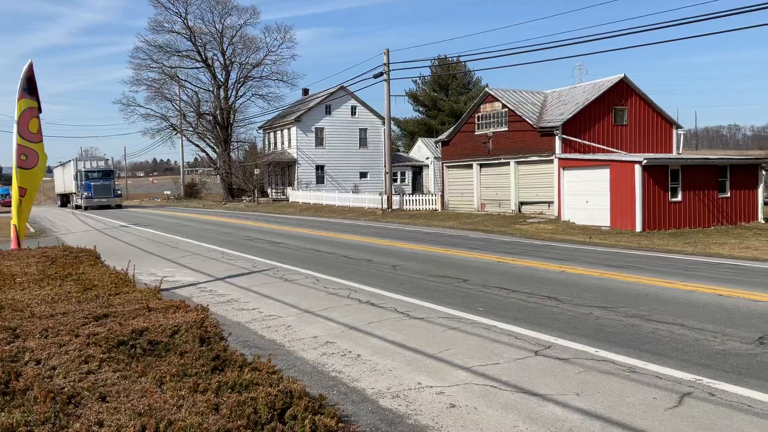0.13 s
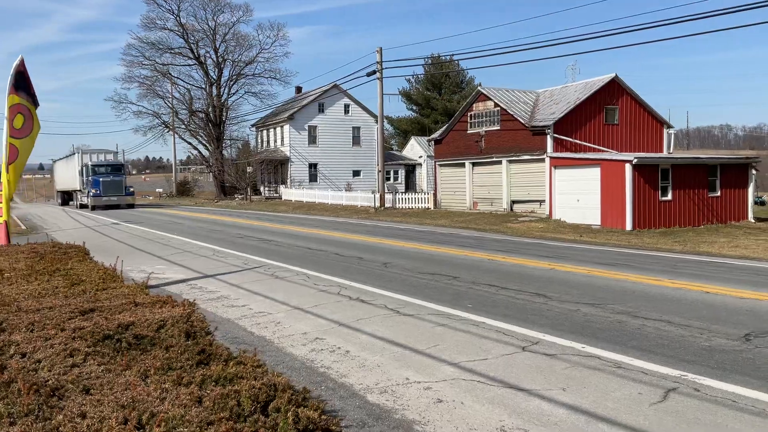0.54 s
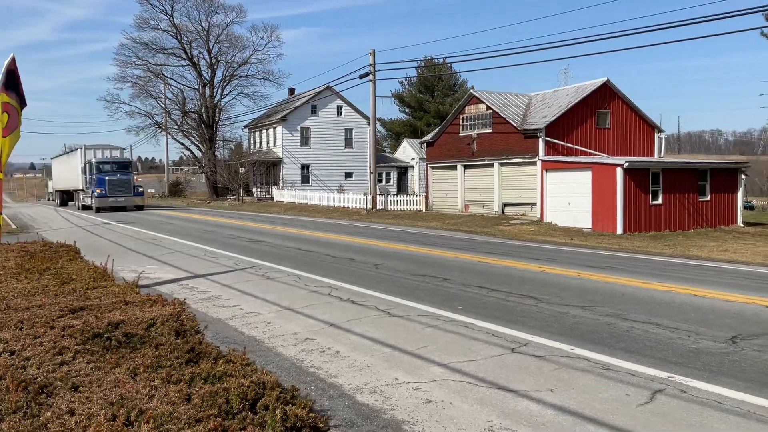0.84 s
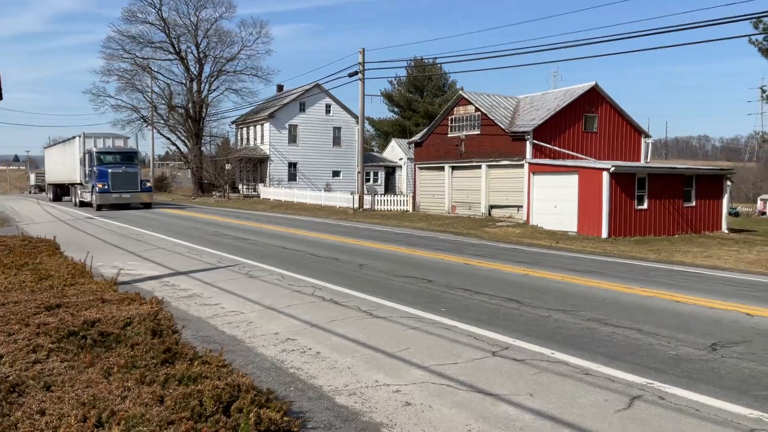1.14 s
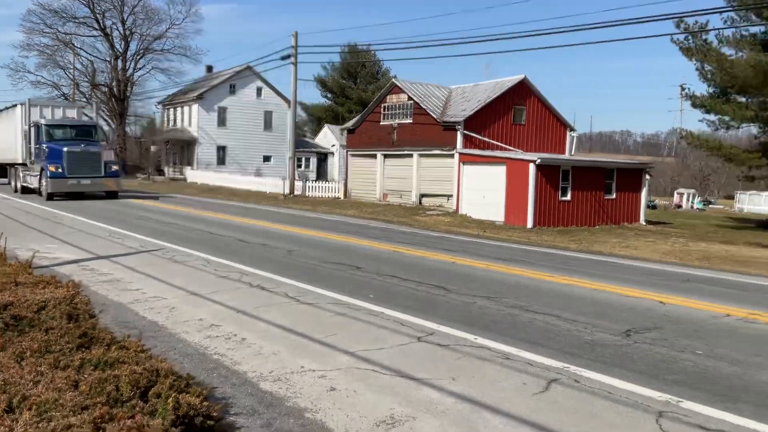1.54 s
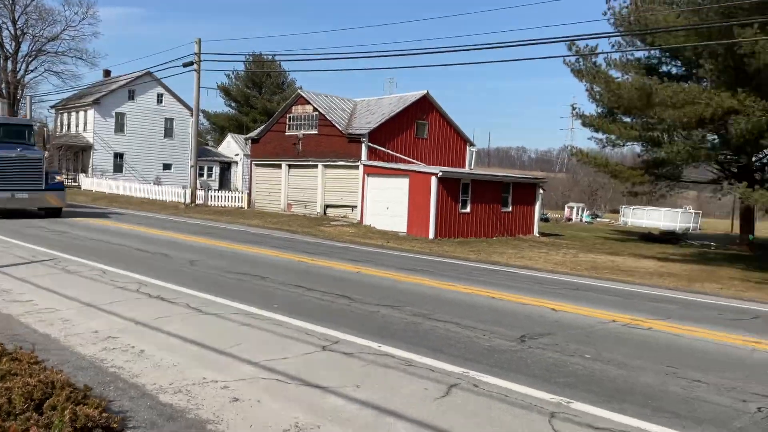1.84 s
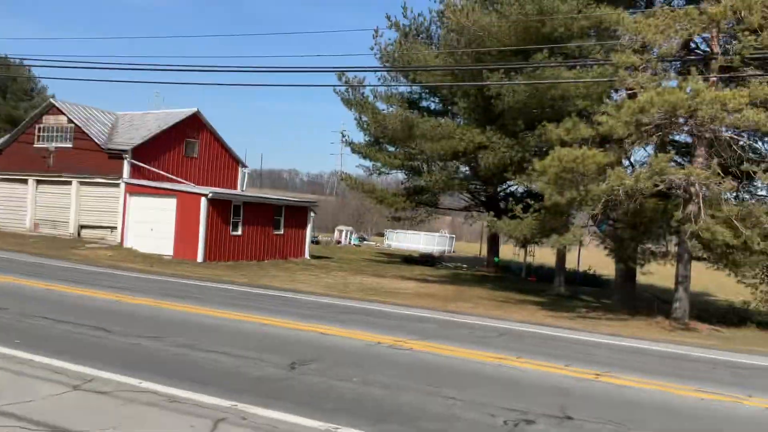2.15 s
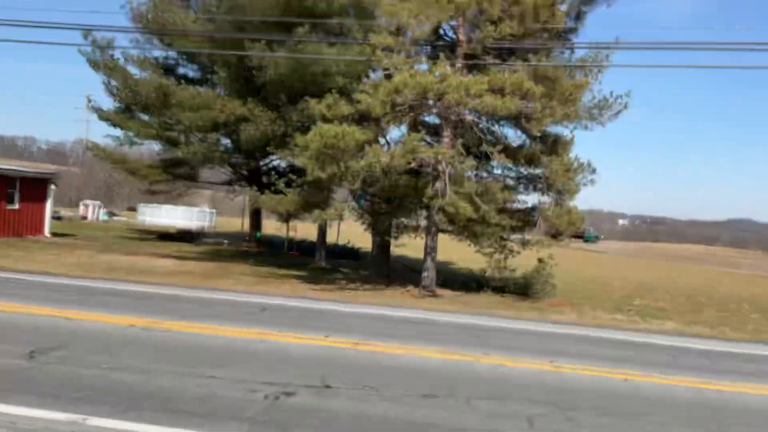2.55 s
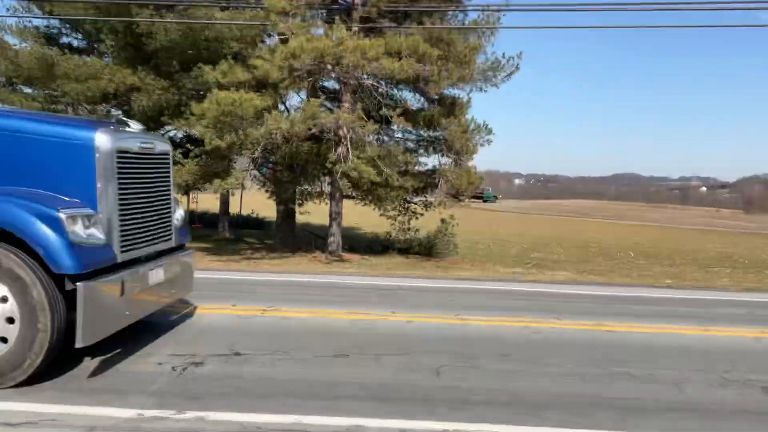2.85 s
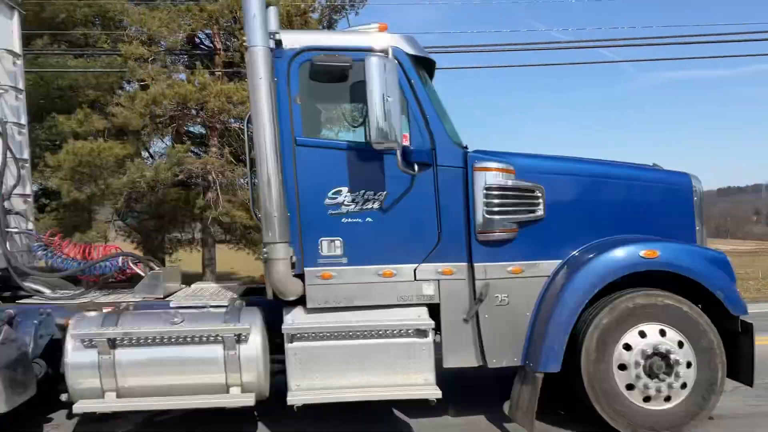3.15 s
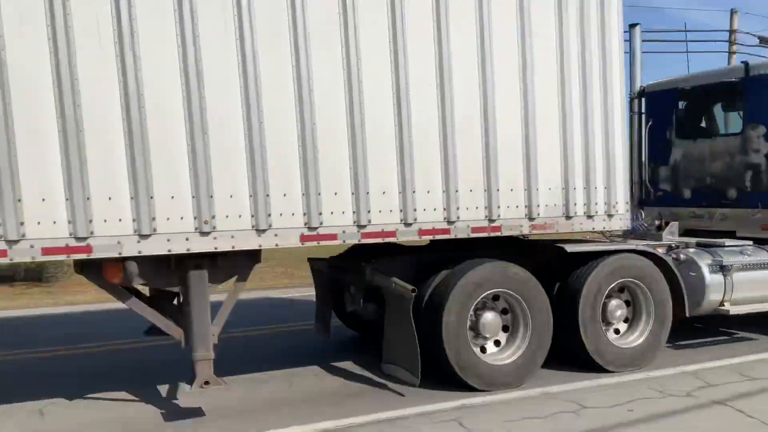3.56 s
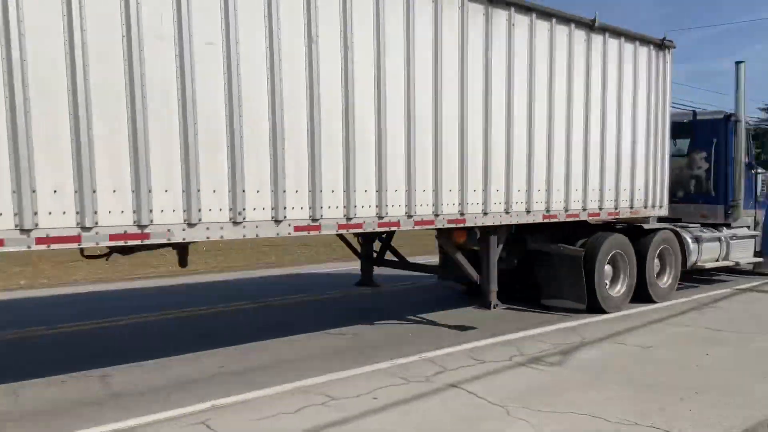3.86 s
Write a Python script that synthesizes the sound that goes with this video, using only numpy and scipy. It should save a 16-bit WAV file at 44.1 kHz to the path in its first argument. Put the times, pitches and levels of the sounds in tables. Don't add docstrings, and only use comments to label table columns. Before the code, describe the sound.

A heavy diesel truck approaches along an open country road, tyre roar and hiss growing; one short air horn toot, then it passes very close to a hand-held camera microphone and its engine pitch drops.

```python
import sys
import numpy as np
from scipy import signal
from scipy.fft import rfft, irfft
from scipy.io import wavfile
from scipy.ndimage import uniform_filter1d

SR = 44100
rng = np.random.default_rng(int(sys.argv[2]) if len(sys.argv) > 2 else 0)


def to_wav(sig):
    pcm = np.clip(np.atleast_2d(sig), -1, 1) * 32767
    pcm = np.round(pcm).astype(np.int16)
    wavfile.write(sys.argv[1], SR, pcm.T)


def magnitude_from_level(level_db):
    exponent = np.asarray(level_db, float) / 20
    return 10 ** exponent


N = 176400
T = np.arange(N) / SR
SLOW_T = T[::64]
BIN_HZ = np.fft.rfftfreq(1024, 1 / SR)


def evened(x):
    return x / np.sqrt(np.mean(x ** 2) + 1e-20)


def read(points, hz):
    f, value = np.transpose(points)
    return np.interp(np.log(hz + 30), np.log(f + 30), value)


def drift(t, top_hz):
    rates_hz = np.geomspace(top_hz / 8, top_hz, 12)
    return evened(sum(np.sin(2 * np.pi * (f * t + rng.random())) / np.sqrt(f) for f in rates_hz))


def phase_of(hz):
    return 2 * np.pi * np.cumsum(hz) / SR


# time in seconds, closeness 0-1.
APPROACH = [(0, 0.07), (.7, 0.26), (1.35, 0.5), (1.8, 0.57), (2.15, 0.67), (2.4, 0.77), (2.62, 0.9),
            (2.85, 0.95), (3.03, 1.04), (3.3, 0.99), (3.7, 0.96), (4, 0.89)]


def closeness(t):
    return np.interp(t, *np.transpose(APPROACH))


# frequency in Hz, density in dB per Hz.
RUMBLE_BAND = [(20, -40), (40, -17), (60, -0.5), (130, 7.5), (200, -2.5), (420, -19)], [(20, -40),
               (40, -20.5), (60, 14), (110, 2.5), (200, 2.5), (420, -2)], -39.5, -21
ROAR_BAND = [(220, -3.5), (380, -1), (503, -7), (638, -12), (823, -8.5), (1050, -6), (1110, -9.5),
             (1540, -5.5), (3100, -28), (4030, -62), (6820, -120)], [(220, -6), (380, -13.5), (465, 1.5),
             (621, -13), (774, -3.5), (981, -3), (1280, -9), (1860, -10.5), (3100, -29.5), (4030, -73),
             (6820, -120)], -43, -21
HISS_BAND = [(1710, -39), (2900, -31), (3140, 4.5), (4890, 1.5), (5440, -4), (6320, -6.5), (10500, -30),
             (12300, -64), (16000, -42)], [(1710, -40), (2900, -4), (3540, -0.5), (4580, 0), (5210, -2),
             (6010, -2.5), (7190, -8.5), (15000, -22.5), (16000, -29)], -61, -36


def road(band, patchy_db, flicker_db):
    far, near, far_db, near_db = band
    t = (np.arange(N // 256 + 6) * 256 / SR)[:, None]
    close = closeness(t)
    inside = (BIN_HZ >= far[0][0]) & (BIN_HZ < far[-1][0])

    def bins_db(spectrum, level_db):
        colour_db = read(spectrum, BIN_HZ)
        return level_db + colour_db - 20 * np.log10(np.linalg.norm(inside * magnitude_from_level(colour_db)))

    far_bins_db, near_bins_db = bins_db(far, far_db), bins_db(near, near_db)
    real, imag, patches = rng.standard_normal((3, len(t), len(BIN_HZ)))
    patches = uniform_filter1d(patches, size=10, axis=0)
    patches = evened(uniform_filter1d(patches, size=10, axis=1))

    notch_hz, notch_width_hz = 2880 + 280 * close, 170
    notch_depth_db = -19 * (1 - close ** 2).clip(0) * (1 + .35 * drift(t, 6)).clip(0)
    notch_db = notch_depth_db * np.exp(-((BIN_HZ - notch_hz) / notch_width_hz) ** 2)
    fizz_s, fizz_width_s, fizz_hz = 2.08, .66, 7800
    fizz_db = 8 * np.exp(-((t - fizz_s) / fizz_width_s) ** 2) / (1 + (fizz_hz / (BIN_HZ + 1)) ** 4)

    level_db = far_bins_db + close * (near_bins_db - far_bins_db) + notch_db + fizz_db
    level_db = level_db + patchy_db * patches + flicker_db * drift(t, 20)
    z = (real + 1j * imag) * inside * magnitude_from_level(level_db)
    return 1.81 * signal.istft(z.T, nperseg=1024, noverlap=768)[1][:N]


def wavering(angle, slow_db):
    level = np.interp(T, SLOW_T, magnitude_from_level(slow_db + 1.5 * drift(SLOW_T, 8)))
    waver_rad = np.interp(T, SLOW_T, .22 * drift(SLOW_T, 8))
    return np.sqrt(2) * level * np.cos(angle + waver_rad)


# time in seconds, pitch in Hz, level in dB, level of its octave in dB.
EXHAUST = [(0, 143.5, -30, -49), (.7, 143.5, -29, -48), (1.3, 142, -25, -44), (1.45, 141.8, -22, -41),
           (1.6, 141.8, -23.5, -43), (2.3, 140.7, -22, -40), (2.6, 140.4, -24, -36),
           (2.76, 139.7, -30, -29), (2.86, 138.8, -33, -29), (2.95, 137.5, -21, -26), (3.05, 136, -16, -30),
           (3.15, 134.5, -15, -18), (3.28, 130.8, -13, -15.5), (3.36, 129.5, -13.5, -29),
           (3.45, 128.6, -20, -22), (3.65, 126.8, -24, -27), (4, 125, -30, -31)]
# multiple of a sixth of the exhaust note, dB far, dB abeam.
ENGINE_ORDERS = [(2, -24, -26), (3, -7, -13), (5, -16, -12), (6, 0, 0), (8, -8, -8), (10, -19, -16),
                 (16, -24, -12), (21, -38, -13), (24, -28, -17)]


def engine():
    s, hz, level_db, octave_db = np.transpose(EXHAUST)
    turn = phase_of(np.interp(T, s, hz)) / 6
    abeam_s, abeam_width_s = 2.7, .15
    abeam = 1 / (1 + np.exp(-(SLOW_T - abeam_s) / abeam_width_s))
    note_db = np.interp(SLOW_T, s, level_db)
    out = wavering(12 * turn, np.interp(SLOW_T, s, octave_db))
    for order, far_db, abeam_db in ENGINE_ORDERS:
        out += wavering(round(order) * turn, note_db + far_db + abeam * (abeam_db - far_db))
    return out


# Hz far, Hz near, dB far, dB near,
# dB added once the cab has passed, closeness of full level.
BODY_TONES = [
    (95, 95, -37, -22, -9, 1),
    (500, 478, -58, -33, 0, .62),
]


def drones():
    close = closeness(SLOW_T)
    passed = np.clip((SLOW_T - 3) / .5, 0, 1)
    out = np.zeros(N)
    for far_hz, near_hz, far_db, near_db, passed_db, full in BODY_TONES:
        angle = phase_of(np.interp(T, SLOW_T, far_hz + close * (near_hz - far_hz)))
        level_db = far_db + np.minimum(close / full, 1) * (near_db - far_db)
        out += wavering(angle, level_db + passed_db * passed)
    return out


# start in seconds, length in seconds, pitch in Hz, level in dB.
BIRD_PEEPS = [
    (.33, .06, 6250, -61),
    (1.13, .085, 8200, -60),
    (3.035, .016, 11600, -47),
]


def bird():
    out = np.zeros(N)
    for s, length_s, hz, db in BIRD_PEEPS:
        u = np.clip((T - s) / length_s, 0, 1)
        swell = np.sin(np.pi * u).clip(0) ** .4 * (u < 1)
        out += magnitude_from_level(db) * swell * np.sin(phase_of(hz + 60 * np.sin(7 * u)))
    return out


# start in seconds, peak level in dB.
GRIT_TICKS = [
    (.735, -63),
    (.846, -55),
    (.90, -60),
    (.985, -66),
    (1.85, -53),
    (3.727, -34),
]


def grit():
    out = np.zeros(N)
    for s, db in GRIT_TICKS:
        burst = np.diff(uniform_filter1d(rng.standard_normal(601), size=3))
        out[round(s * SR):][:600] += burst * magnitude_from_level(db + 12 - 60 * T[:600] / .025)
    return out


# time in seconds, pitch in Hz, air pressure in dB.
HORN_BLAST = [
    (2.396, 294.5, -30),
    (2.412, 295.4, -2.5),
    (2.424, 295.5, 0),
    (2.507, 295.5, 0),
    (2.54, 295.6, -1.3),
    (2.565, 297, -4.5),
    (2.61, 303, -10),
    (2.69, 305, -11),
    (2.72, 305, -30),
]
# multiple of the pitch, level in dB, bloom time in seconds.
HORN_PARTIALS = [(1, .5, 2.44), (2, -6, 2.47), (3, -13, 2.54), (4, -5, 2.45), (5, -12, 2.44),
                 (6, -8, 2.465), (7, -10, 2.5), (8, -20, 2.49), (9, -15, 2.495), (10, -23, 2.465),
                 (11, -32, 2.43), (12, -21, 2.44), (13, -23, 2.52), (14, -21, 2.48), (15, -13, 2.505),
                 (16, -21, 2.435), (17, -17, 2.495), (18, -13, 2.465), (19, -23, 2.505), (20, -18, 2.475),
                 (21, -13.5, 2.46), (22, -23, 2.465), (23, -20, 2.455), (24, -27, 2.455), (25, -35, 2.46),
                 (26, -31, 2.495), (27, -26, 2.46), (28, -26, 2.49), (29, -26, 2.48), (30, -23, 2.435),
                 (31, -27, 2.465), (32, -30, 2.495), (33, -31, 2.495), (34, -35, 2.495), (35, -42, 2.44),
                 (36, -44, 2.47), (37, -40, 2.47), (38, -44, 2.49), (39, -39, 2.46), (40, -45, 2.47),
                 (41, -39, 2.495), (42, -46, 2.465), (43, -48, 2.49), (44, -52, 2.46), (45, -49, 2.47),
                 (46, -40, 2.475), (47, -49, 2.44), (48, -62, 2.44), (49, -45, 2.465), (50, -45, 2.48),
                 (51, -39, 2.48)]


def horn():
    s, hz, pressure_db = np.transpose(HORN_BLAST)
    start, stop = round(s[0] * SR), round(s[-1] * SR)
    t = T[start:stop]
    turn, push_db = phase_of(np.interp(t, s, hz)), np.interp(t, s, pressure_db)

    tone = np.zeros(len(t))
    for k, db, bloom_s in HORN_PARTIALS:
        pressure_gain = .5 + .55 * min(k - 1, 18) + (k > 1)
        before_bloom_db = 7 * (1 - np.exp(-((t - bloom_s) / .035) ** 2))
        moving_db = min(1, k / 8) * (1.6 * drift(t, 24.96) - before_bloom_db)
        jitter_rad = .04 * min(k, 18) * drift(t, 60)
        angle = k * turn + 2 * np.pi * rng.random() + jitter_rad
        tone += magnitude_from_level(db + push_db * pressure_gain + moving_db) * np.cos(angle)

    leak_band = signal.butter(4, [3500, 7200], "band", fs=SR, output="sos")
    leak = evened(signal.sosfilt(leak_band, rng.standard_normal(len(t))))
    rise = np.clip((t - s[1]) / (s[2] - s[1]), 0, 1)
    leak *= magnitude_from_level(-31.5 + .8 * push_db) * rise * (1 + .2 * np.cos(turn))
    out = np.zeros(N)
    out[start:stop] = np.sqrt(2) * magnitude_from_level(-15) * tone + leak

    echo_t, echo_t60_s, echo_delay_s, echo_db = T[:SR // 2], .26, .015, -7
    echo = signal.lfilter([1, -1], [1, -.8], rng.standard_normal(SR // 2))
    echo *= magnitude_from_level(-60 * echo_t / echo_t60_s) * (echo_t > echo_delay_s)
    return out + magnitude_from_level(echo_db) * signal.oaconvolve(out, echo / np.linalg.norm(echo))[:N]


# frequency in Hz, left over right in dB.
PORT_LEANS = [
    [(70, -1), (400, -3), (700, 5.5), (1410, -2.5), (2300, -5.5), (3800, -1.5), (6000, -2.5), (7500, 0)],
    [(70, -1), (400, -3), (700, 7.5), (1410, 3), (2300, -7), (3800, -5), (6000, -6), (7500, 0)],
    [(70, -1.2), (400, -4.5), (700, 4), (1410, -1), (2300, -6.5), (3800, -1.5), (6000, -1.5), (7500, 0)],
]
# frequency in Hz, coherence 0-1.
PORT_LIKENESS = [(60, .9995), (130, .99), (250, .93), (500, .73), (1000, .63), (2000, .45), (3000, .6),
                 (7500, .999)]
# frequency in Hz, radians left leads.
PORT_LEAD = [(60, 0.05), (250, .55), (520, 1.5), (780, 2.5), (1030, 1.3), (1890, 1.1), (2670, -2.3),
             (4310, -5.8), (5340, -5.8), (7000, -6.28)]


def ports(x, spread):
    z = signal.stft(x, nperseg=1024, noverlap=768)[2]
    t = np.arange(z.shape[1]) * 256 / SR
    come, go = np.clip((t - 1.7) / .35, 0, 1), np.clip((t - 3.03) / .27, 0, 1)
    weights = 1 - come, come - go, go
    lean_db = sum(read(table, BIN_HZ)[:, None] * w for table, w in zip(PORT_LEANS, weights))
    lean = magnitude_from_level(lean_db / 2 * np.where(BIN_HZ < 7000, 1, .3)[:, None])
    phase = read(PORT_LEAD, BIN_HZ)[:, None]
    same = 1 - spread * (1 - read(PORT_LIKENESS, BIN_HZ)[:, None])

    scatter = rng.standard_normal(z.shape) + 1j * rng.standard_normal(z.shape)
    scatter = signal.lfilter([1], [1, -.5], scatter, axis=1) * np.sqrt(3 / 4)
    envelope = np.sqrt(uniform_filter1d(abs(z) ** 2, size=3, axis=1).clip(0))
    right = (same * z + np.sqrt(1 - same ** 2) * envelope * scatter) * np.exp(-1j * phase)
    mid = np.sqrt(lean ** 2 + lean ** -2 + 2 * same * np.cos(phase)) / 2
    pair = np.array([z * lean, right / lean]) / mid
    return signal.istft(pair, nperseg=1024, noverlap=768)[1][:, :N]


def scene():
    noise = road(RUMBLE_BAND, patchy_db=1, flicker_db=1.5)
    noise += road(ROAR_BAND, patchy_db=1, flicker_db=0)
    noise += road(HISS_BAND, patchy_db=1.5, flicker_db=.2)
    tones = engine() + drones() + bird() + grit() + horn()
    return ports(noise, spread=1) + ports(tones, spread=.25)


def band_limit(x):
    return signal.sosfilt(signal.butter(12, 16410, fs=SR, output="sos"), x)


# frequency in Hz, level in dB.
MIC_HISS = [(3000, -36), (9000, -11), (11500, -9), (12000, 0), (12500, -9), (16000, -13)]


def record(dry):
    hiss_gain = magnitude_from_level(read(MIC_HISS, np.fft.rfftfreq(N, 1 / SR)))
    hiss = irfft(rfft(rng.standard_normal(N)) * hiss_gain, N)
    bass_cut = signal.butter(4, 42, "high", fs=SR, output="sos")
    mix = signal.sosfilt(bass_cut, dry) + magnitude_from_level(-86) * evened(hiss)
    start_s, jump = .0345, .045
    mix = (mix + jump * np.exp(-abs(T - start_s) / .002)) * (T > start_s)
    mix = np.tanh(mix / 1.644) * 1.327
    return band_limit(mix)


dry = scene()
out = record(dry)
to_wav(out)
```